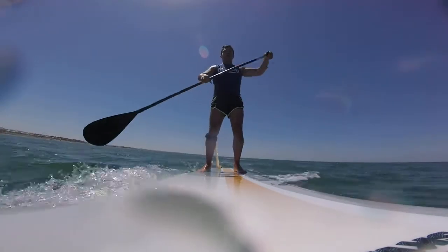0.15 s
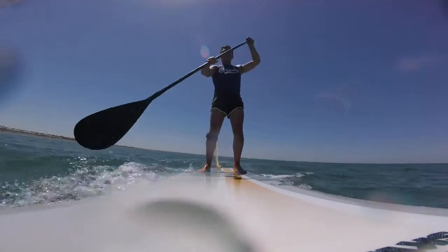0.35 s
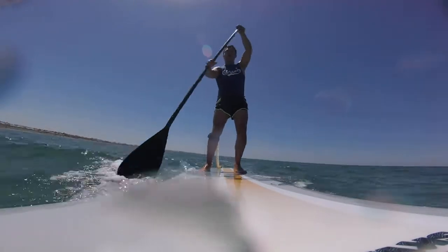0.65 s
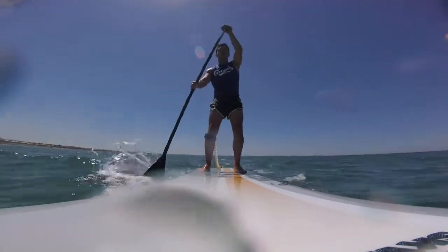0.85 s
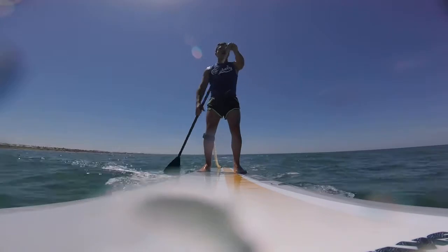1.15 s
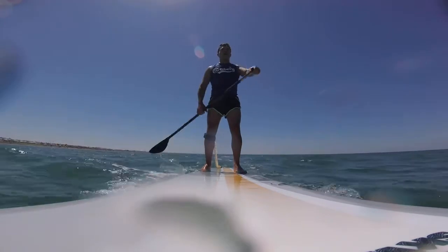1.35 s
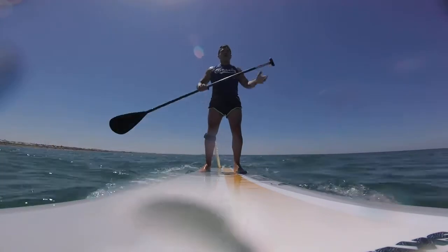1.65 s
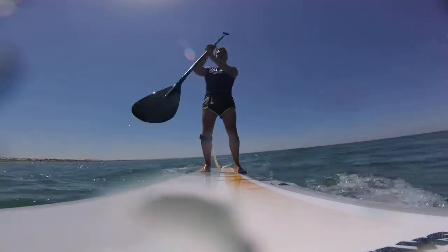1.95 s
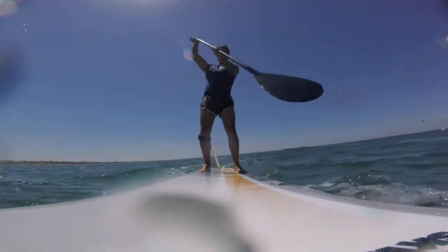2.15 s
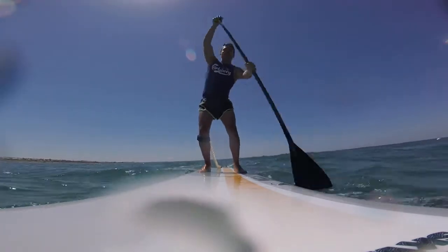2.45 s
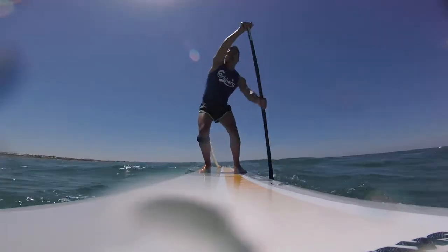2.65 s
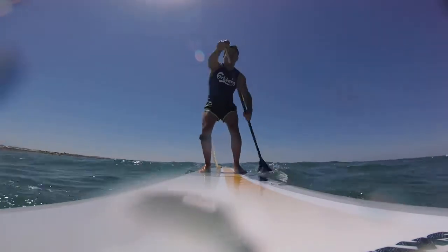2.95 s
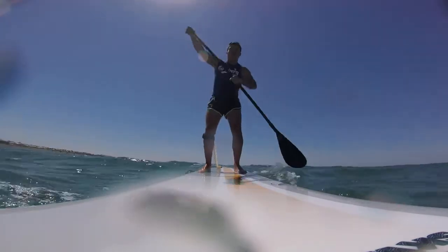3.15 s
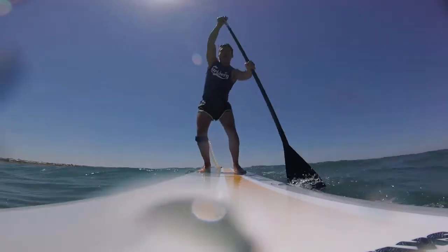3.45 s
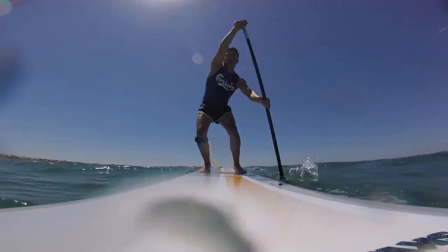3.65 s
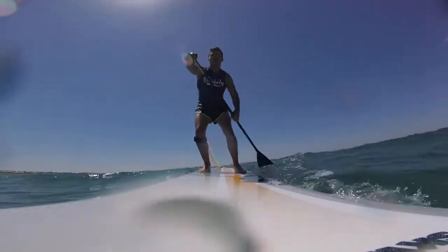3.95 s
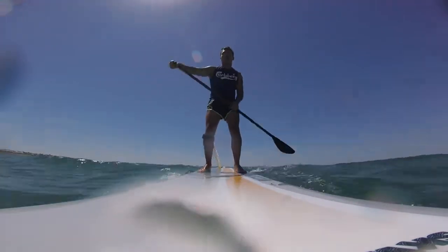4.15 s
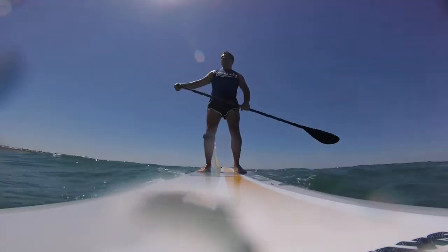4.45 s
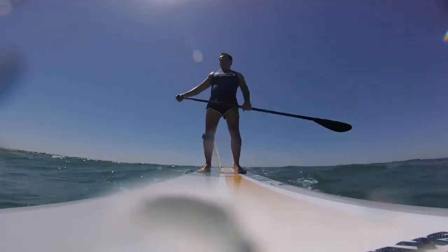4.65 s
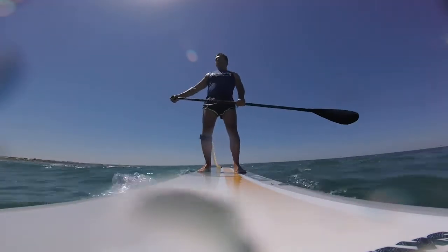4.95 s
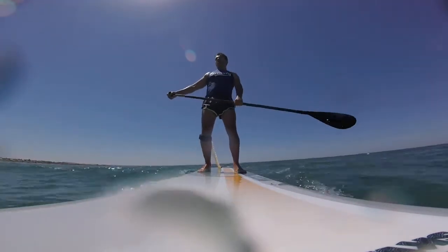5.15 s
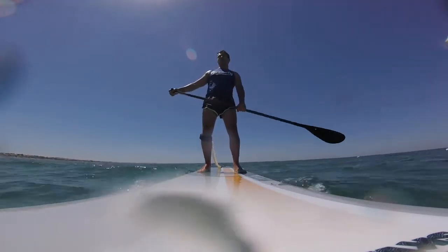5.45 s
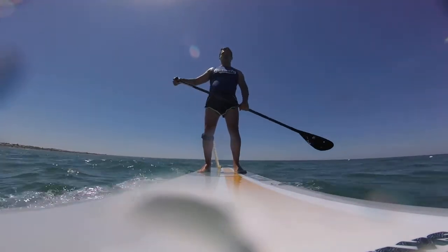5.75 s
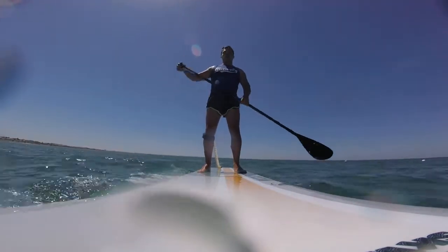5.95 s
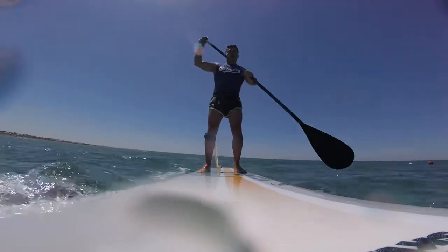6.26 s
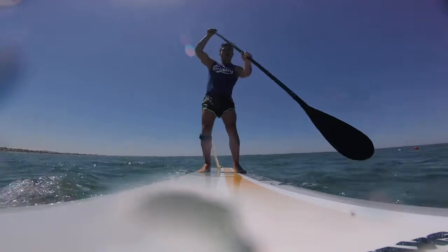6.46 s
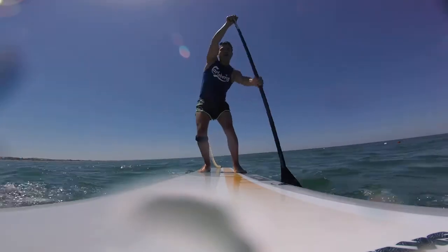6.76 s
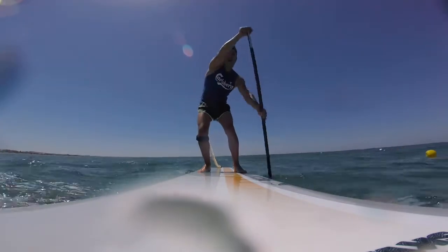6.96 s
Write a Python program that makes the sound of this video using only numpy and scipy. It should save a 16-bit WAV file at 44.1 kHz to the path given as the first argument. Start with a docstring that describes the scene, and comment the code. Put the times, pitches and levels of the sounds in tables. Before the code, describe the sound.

Heard very close, from inside a sealed case on a paddleboard's nose at sea: wavelets slap underneath with hollow, pitched booms, gurgles and plops. The slaps pause while wind gusts thump and spray patters with plinking drops. Then dense slapping and bubbling return, ease into a brief lull, and end with lighter slaps and drops.

```python
"""A paddleboard runs through choppy sea for seven seconds, heard from a waterproof case on its nose.
First wavelets squeeze air pockets under the hollow nose into throbbing booms, with smacks, gurgle and plops.
Then the slaps pause: gusts rumble and buffet over the breeze, spray showers the deck and drops plink.
The slaps return at their thickest, ringing hull and board, while water gurgles and bubble-click foam fizzes.
After a short lull, lighter slaps and the last drops close the scene."""
import sys
import numpy as np
from scipy import signal
from scipy.io import wavfile
from scipy.ndimage import uniform_filter1d

SR = 44100
rng = np.random.default_rng(int(sys.argv[2]) if len(sys.argv) > 2 else 0)


def digitize_waveform(pressure):
    """Quantize a signal to 16-bit integers and store it at the path in sys.argv[1].

    Rows of a 2-D input are taken as channels; values are limited to [-1, 1].
    """
    field = np.atleast_2d(pressure).T
    bounded = np.clip(field, -1, 1)
    quanta = np.round(bounded * 32767).astype(np.int16)
    wavfile.write(sys.argv[1], SR, quanta)


N = 312669
TIME = np.arange(N) / SR

# Levels in the tables are relative; the trims in the functions set the mix.
# steady wind on the case: time_s, rumble_db
BREEZE = [(0.05, -44.5), (0.7, -56), (1.3, -54), (2.45, -47), (3.05, -38), (3.55, -44), (3.73, -49),
          (4.0, -46.5), (4.5, -42), (5.25, -41.5), (5.5, -50), (6.05, -57.5), (6.4, -49), (6.75, -42),
          (7.08, -40.5)]
# gusts: crest_s, length_s, rumble_db, buffet_db
GUSTS = [(0.605, 0.047, -33, -65), (1.03, 0.07, -43, -57), (2.13, 0.1, -50, -41), (2.61, 0.06, -38.5, -58),
         (2.734, 0.097, -41, -39), (2.8, 0.05, -32, -36), (2.867, 0.035, -37, -49),
         (3.199, 0.17, -45, -45.5), (3.376, 0.028, -44, -40.5), (3.43, 0.07, -51, -54),
         (3.567, 0.35, -40, -43), (3.833, 0.091, -26, -30.5), (3.895, 0.057, -32, -35),
         (3.95, 0.06, -29, -39), (4.067, 0.031, -31, -43), (4.263, .05, -31, -63), (6.51, 0.43, -60, -45.5),
         (6.696, 0.035, -53, -33), (7.004, 0.026, -35, -43)]
# colour of the large eddies: freq_hz, density_db (per Hz)
RUMBLE_COLOUR = [(18, -15), (28, -0.5), (50, 9), (75, -5), (95, 5.5), (120, -11), (170, -21.5)]
# colour of the smaller eddies: freq_hz, density_db (per Hz)
BUFFET_COLOUR = [(70, -2), (110, 2.5), (150, 2), (220, 12.5), (400, -28), (800, -24)]
# single hard eddies thumping the case: centre_s, level_db, pitch_hz
THUMPS = [(2.606, -26, 41.8), (2.705, -25, 52), (2.751, -18.5, 86), (2.799, -19, 90), (2.825, -22, 62),
          (2.886, -27, 45), (3.155, -34, 49.8), (3.256, -22, 85), (3.383, -21, 121), (3.392, -23, 38),
          (3.45, -28, 45.17), (3.548, -21, 70.76), (3.808, -21, 75.6), (3.822, -19, 66),
          (3.845, -17, 109.7), (3.867, -17, 69.76), (4.059, -24, 100.1), (7.004, -29, 59.92)]
# breaking water around the board: time_s, splatter_db, fizz_db
BREAKING_WATER = [(0.05, -47, -53), (0.36, -47.5, -48), (0.7, -50, -51), (2.1, -47, -54),
                  (2.36, -51.5, -56), (2.7, -41.5, -45.5), (3.08, -41, -48), (3.18, -37, -39),
                  (3.36, -40.5, -46), (3.6, -48.5, -50.5), (4.24, -42, -46.5), (4.75, -46, -49),
                  (5.4, -44, -46), (5.44, -58, -60), (5.85, -53, -55), (6.42, -45.5, -48.5),
                  (6.73, -43, -49.5), (6.79, -48, -55)]
# handfuls of spray landing on the deck: crest_s, length_s, level_db
SHOWERS = [(2.124, 0.018, -55), (2.401, 0.024, -55), (2.63, 0.013, -62), (3.008, 0.043, -48.5),
           (3.151, 0.048, -43), (3.243, .02, -45), (3.267, 0.025, -41.5), (3.44, 0.017, -45),
           (3.627, 0.014, -48), (3.772, 0.022, -55), (3.86, 0.012, -54), (4.092, 0.031, -50.5),
           (6.32, 0.015, -60)]
# colour of falling water: freq_hz, density_db (per Hz)
SPLATTER_COLOUR = [(400, -5.5), (700, -3), (1200, -1.5), (1800, -2.5), (2500, -5), (3300, -4.5),
                   (4200, -9.5)]
# colour of bursting foam: freq_hz, density_db (per Hz)
FIZZ_COLOUR = [(3500, 11.5), (4600, 6), (5200, 5.5), (6000, -5), (7000, 2.5), (7800, 5), (8600, -8.5),
               (9300, -11.5)]
# single drops landing close by: start_s, level_db, plink_hz (where it settles), tick_db
DROPS = [(1.227, -41, 1400, 7), (1.562, -19, 1580, -20), (2.178, -35.5, 1300, -3), (2.222, -29, 1266, -1.5),
         (2.4449, -33, 1840, 0), (2.547, -24, 1190, -28), (2.6324, -29, 3390, -8),
         (2.6663, -31.5, 1550, 8.5), (2.7018, -30, 2010, -7), (2.9545, -29, 1950, -18),
         (2.977, -26, 2440, -16), (3.0063, -27, 3040, -17), (3.0395, -28, 1730, -6),
         (3.1628, -27.5, 1877, 0), (3.239, -28, 1700, -21), (3.261, -21, 1820, -27),
         (3.429, -21.5, 1310, -6), (3.5454, -15.5, 3320, -36), (3.6227, -32, 3560, -5),
         (3.666, -31.5, 3600, -2), (3.7665, -20.5, 1256, -8.5), (3.8537, -25.5, 3083, -2.5),
         (4.0527, -28.5, 3460, -17), (4.0861, -24.5, 2950, -11), (4.092, -31, 1206, 1),
         (4.834, -36, 3453, -2), (4.856, -19.5, 1525, -35), (4.914, -29, 1500, -2),
         (4.9615, -24.5, 2940, -14), (5.2179, -27, 1293, 0), (6.3277, -25.5, 2360, -16),
         (6.4149, -19, 3430, -21), (6.418, -24.5, 4690, -16), (6.7187, -28, 1802, -20),
         (6.7308, -16, 1500, -12.5), (6.755, -31, 2710, -15), (7.058, -27, 3000, -15)]
# slowest bending mode of the board: freq_hz, width_hz
BOARD_MODE = (87.4, 19)
# water running along the hull: time_s, drone_db, gurgle_db
HULL_WASH = [(0.05, -51, -42), (0.36, -45, -43.5), (0.6, -32, -29.5), (1.04, -31.5, -34), (1.28, -35, -35),
             (1.72, -34, -29), (2.2, -42, -37), (2.36, -49.5, -45), (3.08, -49, -36), (3.66, -36, -37.5),
             (4.4, -34, -31.5), (4.82, -39, -36), (5.4, -31, -29), (5.425, -42, -31.5), (5.46, -35, -22.5),
             (5.55, -40.5, -38), (5.66, -42, -40.5), (5.8, -37.5, -43.5), (6.02, -55, -55),
             (6.24, -40, -40), (6.62, -37, -34), (6.86, -46, -42.5)]
# resonances of the hollow nose: freq_hz, width_hz, level_db
HULL_MODES = [(277, 13.2, 0.5), (335, 22, -14.5)]
# higher modes of the hull's shell, rung by the water: freq_hz, width_hz, level_db
SHELL_MODES = [(478, 57, -2), (620, 45, -3.5), (837, 49, -10), (920, 72, -10), (1174, 60, -9),
               (1285, 100, -7), (1430, 23, -11.5)]
# colour of the gurgling bubbles: freq_hz, density_db (per Hz)
GURGLE_COLOUR = [(300, -2.5), (380, 1), (470, -6), (620, 3), (730, -47.5), (900, -4), (1050, -9.5),
                 (1250, -11), (1450, -20.5), (1700, -15), (2400, -27)]
# big single bubbles breaking against the hull: start_s, level_db, pitch_hz (before its climb), ring_t60_s
PLOPS = [(0.227, -24, 1240, 0.046), (0.282, -21, 1320, 0.04), (0.472, -16.5, 820, .04),
         (0.537, -11.5, 530, 0.13), (0.589, -21, 1430, 0.081), (0.713, -13, 830, .05),
         (1.02, -6.5, 612.6, 0.053), (1.244, -18, 1220, 0.024), (1.352, -11, 1251, 0.045),
         (1.619, -15.5, 609, 0.087), (1.925, -17.5, 1110, 0.056), (2.143, -16, 1192, 0.046),
         (2.18, -17, 487, .023), (2.183, -11, 1180, 0.015), (2.287, -18.5, 1140, 0.03),
         (2.645, -19, 1100, 0.032), (2.83, -20, 1390, 0.035), (3.231, -11, 583, 0.03),
         (3.434, -9, 990, 0.024), (3.469, -8.5, 1193, 0.036), (3.47, -15.5, 962, 0.032),
         (3.677, -14, 612, 0.049), (3.719, -9.5, 670, 0.029), (3.962, -15.5, 1387, 0.084),
         (4.09, -16, 1210, 0.053), (4.104, -14, 602.5, 0.077), (4.15, -23, 592, 0.034),
         (4.225, -5, 533, 0.1), (4.297, -14, 1226, 0.052), (4.35, -10.5, 1240, 0.067),
         (4.415, -6, 557, 0.026), (4.429, -2.5, 620, 0.064), (4.456, -4, 590, 0.053),
         (4.526, -13, 815, 0.025), (4.564, -3, 550, 0.06), (4.707, -7, 610, 0.032),
         (4.708, -16.5, 1300, 0.031), (4.917, -1.5, 641, 0.061), (4.936, -16, 1415, 0.044),
         (4.983, -23, 1190, 0.043), (5.026, -8, 589, 0.062), (5.045, -15, 1320, .05),
         (5.129, -16, 620, 0.045), (5.19, -14, 567, 0.03), (5.313, -9.5, 579, .035),
         (5.338, -5, 568, 0.041), (5.342, -19, 845, 0.066), (5.388, -8.5, 607, .07),
         (5.392, -12, 840.6, 0.056), (5.459, -14, 884, 0.041), (5.582, -16, 560.5, 0.049),
         (5.677, -14, 590, 0.052), (5.68, -19.5, 1287, 0.038), (5.779, -25, 1282, 0.053),
         (6.313, -22, 913, 0.03), (6.366, -19, 627, 0.08), (6.476, -18, 1160, 0.044),
         (6.555, -18, 983, 0.037), (6.651, -20, 986, 0.051), (6.406, -11, 930, 0.028),
         (6.619, -13, 1020, 0.029)]
# water smacking flat against the nose: start_s, shell_db, knock_db
SMACKS = [(0.41, -20, -28), (1.483, -26, -9), (1.673, -32, -23), (2.041, -27, -22), (2.11, -30, -25),
          (2.181, -20, -22), (2.228, -25, -32), (3.433, -35, -30), (3.541, -24, -20), (3.624, -26, -21),
          (3.934, -16.5, -27), (3.962, -20, -29), (4.15, -24, -29), (4.222, -15.5, -28), (4.349, -23, -29),
          (4.414, -22, -27), (4.526, -19, -22), (4.707, -18.5, -35), (4.871, -18.5, -21), (4.916, -19, -20),
          (4.951, -24, -21), (5.027, -18, -20), (5.189, -17.5, -24), (5.313, -32, -24), (5.388, -24, -20),
          (5.459, -24, -30), (5.582, -23, -20), (6.405, -29, -29)]
# wavelets slapping under the nose: crest_s, length_s, pocket_hz (before squeeze and sag), boom_db, splash_db
SLAPS = [(0.417, 0.0089, 287.3, -22.5, -25.5), (0.45, 0.014, 306, -30, -30),
         (0.551, 0.029, 299.6, -29.5, -35), (0.583, 0.029, 281.7, -13.5, -26.5),
         (0.607, 0.023, 262.6, -21.5, -31), (0.725, 0.036, 290.9, -18.5, -36),
         (0.753, 0.012, 289, -14.5, -47), (0.822, 0.037, 277, -28, -62), (0.959, 0.015, 278, -20, -34),
         (0.994, 0.031, 293.3, -24, -28), (1.038, 0.021, 298, -20, -31.5),
         (1.048, 0.034, 292.3, -24, -30.5), (1.179, 0.019, 278.4, -25, -28),
         (1.26, 0.017, 299.6, -47.5, -34.5), (1.308, 0.02, 294.3, -31, -50), (1.45, 0.069, 300, -25.5, -32),
         (1.489, 0.0083, 300.5, -17.5, -32), (1.515, 0.024, 290.4, -24, -41),
         (1.681, 0.03, 291.6, -22, -33), (1.745, 0.015, 327.5, -19.5, -24.5),
         (1.771, 0.033, 324, -29.5, -28), (1.826, 0.028, 287, -26, -32), (1.967, 0.019, 332.5, -26.5, -30),
         (2.053, 0.035, 282.2, -23, -27), (2.116, 0.016, 319.4, -25.5, -27.5),
         (2.142, 0.024, 280, -38, -27), (2.184, 0.006, 335, -25.5, -33), (2.233, 0.014, 294, -23.5, -31),
         (2.256, 0.017, 295, -24.5, -29.5), (3.271, 0.028, 292, -31.5, -50), (3.345, 0.042, 301, -34, -38),
         (3.439, 0.025, 301, -36.5, -53), (3.492, 0.054, 287.5, -32.5, -41), (3.544, 0.02, 286.5, -22, -39),
         (3.631, 0.022, 291, -25.5, -28), (3.717, 0.07, 307, -45.5, -34.5), (3.779, 0.01, 285, -27, -43),
         (3.942, 0.016, 348, -43.5, -22), (3.962, 0.012, 360.5, -18, -19),
         (3.981, 0.025, 281.2, -14.5, -41), (4.123, 0.042, 318.3, -35, -31),
         (4.172, 0.022, 319.8, -26, -19), (4.186, 0.018, 289, -20, -27), (4.204, 0.027, 271, -15.5, -25.5),
         (4.234, 0.019, 289.3, -25.5, -23.5), (4.3, 0.062, 305.2, -26.5, -29),
         (4.356, 0.018, 304.5, -16.5, -26), (4.374, 0.015, 295, -15.5, -32), (4.39, 0.014, 290.5, -21, -35),
         (4.429, 0.021, 292, -17.5, -24), (4.455, 0.016, 307.8, -26, -31), (4.538, 0.029, 295, -23, -23.5),
         (4.558, 0.018, 330, -29.5, -23.5), (4.571, 0.021, 288.5, -15.5, -22.5),
         (4.591, 0.023, 276, -20, -21.5), (4.617, 0.0073, 338.6, -17, -26), (4.636, 0.026, 328.6, -39, -27),
         (4.677, 0.016, 352, -26, -29), (4.875, 0.00995, 313.8, -18.5, -24.5),
         (4.907, 0.019, 299.3, -26, -22.5), (4.92, 0.011, 299, -28, -24),
         (4.956, 0.026, 296.2, -24.5, -28.5), (4.985, 0.017, 278, -19.5, -26),
         (5.034, 0.016, 298.4, -24.5, -22.5), (5.056, 0.046, 290.7, -34.5, -25),
         (5.199, 0.042, 297, -34, -33), (5.253, 0.026, 290.7, -25.5, -34), (5.324, 0.017, 283.3, -23, -31),
         (5.348, 0.022, 292, -20.5, -25.5), (5.395, 0.018, 300, -23, -30), (5.464, 0.012, 329, -22.5, -32),
         (5.476, 0.019, 287, -11.5, -31.5), (5.499, 0.016, 275, -23, -34),
         (5.583, 0.012, 297.6, -29, -28.5), (5.612, 0.031, 362.3, -25.5, -29.5),
         (5.659, 0.018, 278.7, -31.5, -34), (5.788, 0.045, 282, -39, -42.5), (5.825, 0.015, 281, -36, -52),
         (6.375, 0.025, 290.8, -36, -41), (6.413, 0.015, 292, -27, -29), (6.466, 0.036, 261.5, -31.5, -36),
         (6.515, 0.015, 267.8, -23.5, -31), (6.57, 0.022, 266, -27.5, -49), (6.629, 0.028, 300, -31, -47),
         (6.698, 0.029, 270.3, -30.5, -38), (6.949, 0.017, 304, -31.5, -58),
         (6.973, 0.014, 292, -32.5, -59)]
# peaks and the notch of the case wall: freq_hz, width_hz, gain_db
CASE_WALL = [(3545, 680, 10), (4100, 646, -23), (6496, 680, 14.5), (8685, 860, 14.5)]

CUTOFF_HZ = 9400
# every surge of water or air swells for this share of its length and fades for the rest
SWELL_SHARE = 0.414
# how long slosh, hull drone and board thrum take to die away after a slap
SLOSH_T60_S, DRONE_T60_S, THRUM_T60_S = 0.11, 0.089, 0.35


def from_db(db):
    """Decibels to amplitude."""
    return 10 ** (np.asarray(db) / 20)


def rms_one(x):
    """Scales a sound to rms 1."""
    return x / np.sqrt(np.mean(x ** 2) + 1e-20)


def in_time(rows):
    """Each column of a curve, sample by sample."""
    times, *columns = np.transpose(rows)
    return [np.interp(TIME, times, column) for column in columns]


def at_hz(points, hz):
    """A spectrum read on a log-frequency axis."""
    freqs, levels = np.transpose(points)
    return np.interp(np.log(hz), np.log(freqs), levels)


def drift(rate_hz):
    """Slow random wandering of spread 1, drawn at every 40th sample."""
    r = np.exp(-80 * np.pi * rate_hz / SR)
    noise = rng.standard_normal(N // 40 + 2002)
    slow = signal.lfilter([1], [1, -2 * r, r * r], noise)[2000:]
    return np.interp(np.arange(N) / 40, np.arange(len(slow)), rms_one(slow))


def resonate(x, hz, width_hz):
    """A two-pole resonance with gain 1 on top."""
    r = np.exp(-np.pi * width_hz / SR)
    top = np.array([1, 0, -1]) * (1 - r * r) / 2
    return signal.lfilter(top, [1, -2 * r * np.cos(2 * np.pi * hz / SR), r * r], x + 1e-18)


def band(x, low_hz, high_hz):
    """A Butterworth band-pass."""
    return signal.sosfilt(signal.butter(2, [low_hz, high_hz], "band", fs=SR, output="sos"), x)


def steady(x, span_s):
    """Evens out the level over stretches longer than the span; finer grain stays."""
    size = max(int(span_s * SR), 2)
    power = uniform_filter1d(uniform_filter1d(x * x, size), size)
    return x / np.sqrt(np.abs(power) + 1e-6 * np.mean(x * x))


def add(track, start_s, sound):
    """Mixes a sound into a track at a time."""
    room = track[int(start_s * SR):][:len(sound)]
    room += sound[:len(room)]


def clicks(per_s, spread_db):
    """Impulses at random moments, many small and a few large."""
    born = rng.random(N) < per_s / SR
    size = from_db(spread_db * np.minimum(rng.exponential(1, N), 4))
    return born * size * np.sign(rng.standard_normal(N))


def colour(sources, spectrum, patchy_db, flicker_hz, count):
    """Bands dealt in turn to the sources, each flickering on its own; rms 1."""
    edges = np.geomspace(spectrum[0][0], spectrum[-1][0], count + 1)
    out = 0
    for k, (low, high) in enumerate(zip(edges, edges[1:])):
        gain = from_db(at_hz(spectrum, np.sqrt(low * high)) + patchy_db * drift(flicker_hz))
        out = out + gain * band(sources[k % len(sources)], low, high)
    return rms_one(out)


def bubbles(births, spectrum, cycles, count):
    """Each birth rings one bubble size, 60 dB down after some cycles; rms 1."""
    dealt, out = rng.integers(0, count, N), 0
    for k, hz in enumerate(np.geomspace(spectrum[0][0], spectrum[-1][0], count)):
        width_hz = np.log(1000) / np.pi * hz / cycles
        ringing = resonate(births * (dealt == k), hz, width_hz)
        out = out + from_db(at_hz(spectrum, hz)) * np.sqrt(hz) * rms_one(ringing)
    return rms_one(out)


def bubble(hz, t60_s, rise):
    """One bubble rings down, its pitch climbing as it nears the surface."""
    t = np.arange(int(t60_s * SR) + 2) / SR
    onset = 1 - np.exp(-2 * hz * t)
    return from_db(-60 * t / t60_s) * onset * np.sin(2 * np.pi * hz * t * (1 + rise * t / t60_s))


def lone_bubbles(low_hz, high_hz, count):
    """Scattered bubbles that chirp clear of the wash; rms 1."""
    out = np.zeros(N)
    for when, size, strength, life in rng.random((count, 4)):
        hz = low_hz * (high_hz / low_hz) ** size
        chirp = bubble(hz, (18 + 26 * life) / hz, rise=0.13)
        add(out, when * TIME[-1], from_db(-12 * strength - 4 * size) * chirp)
    return rms_one(out)


def surge(t, length_s, swell_shape=1.83, fade_shape=1.33):
    """One push of water or air: swells to 1 at its crest, then fades; above one half for its length."""
    length_s = max(length_s, 0.006)
    early = np.abs(t) / (SWELL_SHARE * length_s)
    late = np.abs(t) / ((1 - SWELL_SHARE) * length_s)
    return 0.5 ** np.where(t < 0, early ** swell_shape, late ** fade_shape)


def surges(times, lengths, levels_db):
    """The joint strength of a row of surges, summed as power."""
    power = np.zeros(N)
    for s, length_s, level_db in zip(times, lengths, levels_db):
        near = slice(*np.searchsorted(TIME, [s - 2 * length_s, s + 2 * length_s]))
        power[near] += (from_db(level_db) * surge(TIME[near] - s, length_s)) ** 2
    return np.sqrt(power)


def lingering(strength, t60_s):
    """What a slap has stirred up takes a while to settle: power leaks away exponentially."""
    keep = from_db(-60 / (t60_s * SR)) ** 2
    return np.sqrt(signal.lfilter([1 - keep], [1, -keep], strength ** 2 + 1e-18))


def louder(level_db, strength):
    """A level in dB with a surge on top, added as power."""
    return 10 * np.log10(from_db(level_db) ** 2 + strength ** 2)


def wind_levels(calm_buffet_db=-56.0, buffet_follows=0.25):
    """Rumble and buffeting in dB: gusts ride on the breeze, which by itself buffets only a little."""
    breeze_db, = in_time(BREEZE)
    times, lengths, rumble_db, buffet_db = np.transpose(GUSTS)
    eddies_db = calm_buffet_db + buffet_follows * (breeze_db - breeze_db.mean())
    rumble = louder(breeze_db, surges(times, lengths, rumble_db))
    return rumble, louder(eddies_db, surges(times, lengths, buffet_db))


def wind(rumble_db, buffet_db, rumble_trim_db=4.5, buffet_trim_db=4.5):
    """Large eddies rumble as low noise; in gusts smaller ones buffet the case higher up."""
    rumble = colour(rng.standard_normal((2, N)), RUMBLE_COLOUR, patchy_db=8.0, flicker_hz=13, count=8)
    buffet = colour(rng.standard_normal((2, N)), BUFFET_COLOUR, patchy_db=2.5, flicker_hz=24, count=7)
    air = from_db(rumble_db + rumble_trim_db) * steady(rumble, span_s=0.055)
    air = air + from_db(buffet_db + buffet_trim_db) * steady(buffet, span_s=0.032)
    # each passing eddy lifts rumble and buffet together
    return air * from_db(1.6 * drift(11))


def thumps(cycles=0.81):
    """An eddy strikes the case: one deep push and pull of air."""
    out, t = np.zeros(N), np.arange(-SR // 20, SR // 20) / SR
    for s, level_db, hz in THUMPS:
        add(out, s + t[0], from_db(level_db) * surge(t, cycles / hz) * np.sin(2 * np.pi * hz * t))
    return out


def spray_levels(splash, thrown_db=-23.0, shower_db=9.0, shower_fizz_db=-5.5):
    """Splatter and fizz in dB: breaking water, deck showers and the spray each slap throws up."""
    splatter_db, fizz_db = in_time(BREAKING_WATER)
    showers = from_db(shower_db) * surges(*np.transpose(SHOWERS))
    falling = np.hypot(showers, from_db(thrown_db) * splash)
    return louder(splatter_db, falling), louder(fizz_db, from_db(shower_fizz_db) * falling)


def spray(splatter_db, fizz_db, splatter_trim_db=2.5, fizz_trim_db=-2.0, hiss_share=0.95, spit_db=-18.5):
    """Falling water patters in clumps; the foam it leaves bursts in tiny clicks, a few of them sharp."""
    clumps = from_db(2.0 * drift(25))
    patter = bubbles(clicks(per_s=9000 * clumps, spread_db=3.6), SPLATTER_COLOUR, cycles=16, count=26)
    patter = steady(band(patter, 350, 4300), span_s=0.05) + 0.42 * lone_bubbles(750, 2800, count=560)
    spits = from_db(spit_db) * rms_one(clicks(per_s=45, spread_db=4.0))
    foam = []
    for _ in range(2):
        bursts = rms_one(clicks(per_s=4000 * clumps, spread_db=8.5))
        foam.append(bursts + hiss_share * rng.standard_normal(N) + spits)
    fizz = colour(foam, FIZZ_COLOUR, patchy_db=2.5, flicker_hz=77, count=10)
    return from_db(splatter_db + splatter_trim_db) * patter + from_db(fizz_db + fizz_trim_db) * fizz


def drops(plink_db=3.5, tick_db=-5.5, tap_db=-8.5, plink_s=0.0017, tick_s=0.0027,
          climb=0.48, climb_s=0.0005, twin_db=-17.0):
    """A drop taps, ticks in a crackle and traps a bubble whose plink climbs to its note, with a smaller twin."""
    out, crackle = np.zeros(N), rms_one(band(clicks(per_s=5500, spread_db=9.5), 2800, 8000))
    t = np.arange(SR // 30) / SR
    for s, level_db, hz, bright_db in DROPS:
        tap = band(1.0 * (t == 0), 0.55 * hz, 1.2 * hz)
        turn = 2 * np.pi * np.cumsum(hz * (1 - climb * np.exp(-t / climb_s))) / SR
        twin = from_db(twin_db) * np.exp(-t / (2 * plink_s)) * np.sin(1.34 * turn)
        plink = from_db(plink_db) * (np.exp(-t / plink_s) * np.sin(turn) + twin)
        grain = np.roll(crackle, -int(s * SR))[:len(t)]
        tick = from_db(tick_db + bright_db) * np.exp(-t / tick_s) * grain
        spreading = 1 - np.exp(-t / 0.00042)
        landing = from_db(tap_db) * tap / tap.max() + spreading * (plink + tick)
        add(out, s, from_db(level_db) * landing)
    return out


def board_flex(level_db, flex_trim_db=-9.5):
    """The water load makes the whole board bend and thrum: noise through its slowest mode."""
    thrum = band(resonate(rng.standard_normal(N), *BOARD_MODE), 71.4, 99.0)
    return from_db(level_db + flex_trim_db) * steady(thrum, span_s=0.19)


def hull_drone(level_db, drone_trim_db=3.0, wander=0.05, wander_hz=9):
    """Small knocks of water keep the hollow nose ringing; its note wanders as the waterline moves."""
    knocks = clicks(per_s=80, spread_db=2.0)
    ringing = sum(from_db(db) * resonate(knocks, hz, width_hz) for hz, width_hz, db in HULL_MODES)
    # uneven reading speed bends the note
    read_at = np.cumsum(1 + wander * drift(wander_hz)) % N
    ringing = np.interp(read_at, np.arange(N), ringing)
    return from_db(level_db + drone_trim_db) * steady(band(ringing, 231.0, 470), span_s=0.16)


def gurgle(level_db, splash, wash_db=-3.0, splash_db=-0.8):
    """Large bubbles and small blows that ring the shell, in a steady wash and in bursts at each slap."""
    births = clicks(per_s=1500, spread_db=2.2)
    blows = clicks(per_s=600, spread_db=1.2)
    shell = 0
    for hz, width_hz, db in SHELL_MODES:
        shell = shell + from_db(db) * rms_one(resonate(blows * rng.standard_normal(N), hz, width_hz))
    water = bubbles(births, GURGLE_COLOUR, cycles=36, count=32) + rms_one(shell)
    water = water + 0.6 * lone_bubbles(400, 1500, count=640)
    water = steady(band(water, 280, 1570), span_s=0.028)
    wash = from_db(level_db + wash_db + 1.0 * drift(25))
    return water * np.hypot(wash, from_db(splash_db) * splash)


def plops(plop_trim_db=-8.0, slosh_db=-17.0):
    """A big bubble breaks with a short slosh of water around its note."""
    out, slosh = np.zeros(N), rms_one(band(rng.standard_normal(N), 400, 1400))
    for s, level_db, hz, t60_s in PLOPS:
        note = bubble(hz, max(t60_s, 0.01), rise=0.059)
        age = np.arange(len(note))
        burst = from_db(slosh_db - 40 * age / len(note)) * slosh[int(s * SR) + age]
        add(out, s, from_db(level_db + plop_trim_db) * (note + burst))
    return out


def smacks(knock_trim_db=-5.0, crack_db=-12.0, crack_s=0.0031, knock_t60_s=0.066):
    """A flat blow cracks, rings the shell with new strengths each time and knocks the hollow nose."""
    out, t = np.zeros(N), np.arange(SR // 8) / SR
    crackle = rms_one(band(rng.standard_normal(N), 500, 1720))
    hz, width_hz, mode_db = np.transpose(SHELL_MODES)[:, :, None]
    # per blow and mode: strength, sign and a slight detune
    chances = rng.standard_normal((len(SMACKS), 3, len(SHELL_MODES), 1))
    for (s, shell_db, hollow_db), chance in zip(SMACKS, chances):
        strengths = from_db(mode_db + 3.0 * chance[0]) * np.sign(chance[1])
        tones = np.sin(2 * np.pi * hz * (1 + 0.03 * chance[2]) * t)
        shell = np.sum(strengths * np.exp(-np.pi * width_hz * t) * tones, axis=0)
        grain = crackle[int(s * SR):][:len(t)]
        crack = from_db(crack_db) * np.tanh(t / 0.00027) * np.exp(-t / crack_s) * grain
        # the knock starts sharp and sinks to the hull's note
        note = HULL_MODES[0][0] * (1 + 0.46 * np.exp(-t / 0.0052))
        fading = from_db(hollow_db + knock_trim_db - 60 * t / knock_t60_s)
        knock = fading * np.sin(2 * np.pi * np.cumsum(note) / SR)
        add(out, s, from_db(shell_db) * (shell / np.abs(shell).max() + crack) + knock)
    return out


def slaps(boom_trim_db=2.0, sag=0.045, sag_s=0.0088, squeeze=0.22, forming_s=0.00402,
          waver=0.03512, twin_db=-16.0, twin_ratio=1.32):
    """Booms of the trapped air as gliding tones, and the strength of the splash that comes with them."""
    times, lengths, _, _, splash_db = np.transpose(SLAPS)
    # a whisper of weight keeps the pitch defined between slaps
    weight, pitch = np.full(N, 1e-12), np.full(N, 1e-12 * HULL_MODES[0][0])
    for s, length_s, hz, level_db, _ in SLAPS:
        near = slice(max(int((s - 0.1) * SR), 0), int((s + 0.15) * SR))
        t = TIME[near] - s
        # the pocket starts small and high, then spreads under the hull and its pitch sags
        forming = (1 - np.tanh((t + SWELL_SHARE * length_s) / forming_s)) / 2
        push = (from_db(level_db) * surge(t, length_s)) ** 2
        weight[near] += push
        # where slaps overlap, the strongest wavelet dominates the note
        pitch[near] += push * hz * (1 + squeeze * forming - sag * np.tanh(t / sag_s))
    turn = 2 * np.pi * np.cumsum(pitch / weight * (1 + waver * drift(47.2))) / SR
    # a smaller pocket beside it rings higher and makes the boom throb
    twin = from_db(twin_db + 4.4 * drift(5.6)) * np.sin(twin_ratio * turn + 1.52 * drift(14))
    boom = from_db(boom_trim_db) * np.sqrt(2 * weight) * (np.sin(turn) + twin)
    return boom, surges(times, lengths, splash_db)


def scene(ring_on_db=-4.0, slosh_on_db=-1.0, thrum_on_db=-6.0, calm_thrum_db=-1.5):
    """Wind and water around the nose; after each slap the hull drones, the board thrums, the water gurgles on."""
    boom, splash = slaps()
    air = wind(*wind_levels()) + thumps()
    falling_water = spray(*spray_levels(splash)) + drops()
    drone_db, gurgle_db = in_time(HULL_WASH)
    thrum = board_flex(louder(drone_db + calm_thrum_db, from_db(thrum_on_db) * lingering(boom, THRUM_T60_S)))
    # the drone takes over only where it outlasts the boom itself
    after_boom = np.maximum(lingering(boom, DRONE_T60_S) - np.abs(signal.hilbert(boom)), 0)
    drone = hull_drone(louder(drone_db, from_db(ring_on_db) * after_boom))
    slosh = from_db(slosh_on_db) * lingering(splash, SLOSH_T60_S)
    water = gurgle(louder(gurgle_db, slosh), splash)
    under_nose = thrum + drone + water + plops() + smacks() + band(boom, 180, 1500)
    return (air + falling_water + under_nose)[None]


def record(dry):
    """The case wall colours the sound with peaking filters; a steep low-pass cuts the top."""
    for hz, width_hz, gain_db in CASE_WALL:
        w, lift = 2 * np.pi * hz / SR, from_db(gain_db / 2)
        damp = np.sin(w) * width_hz / (2 * hz)
        zeros = [1 + damp * lift, -2 * np.cos(w), 1 - damp * lift]
        poles = [1 + damp / lift, -2 * np.cos(w), 1 - damp / lift]
        dry = signal.lfilter(zeros, poles, dry)
    return signal.sosfilt(signal.ellip(10, 0.3, 70, CUTOFF_HZ, fs=SR, output="sos"), dry)


dry = scene()
out = record(dry)
digitize_waveform(out)
```